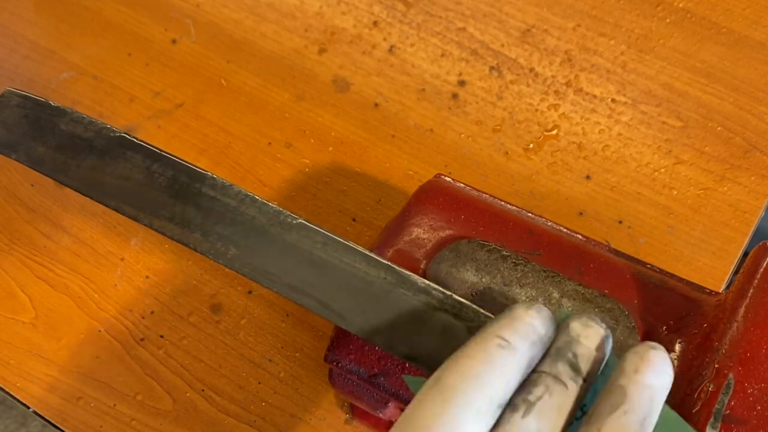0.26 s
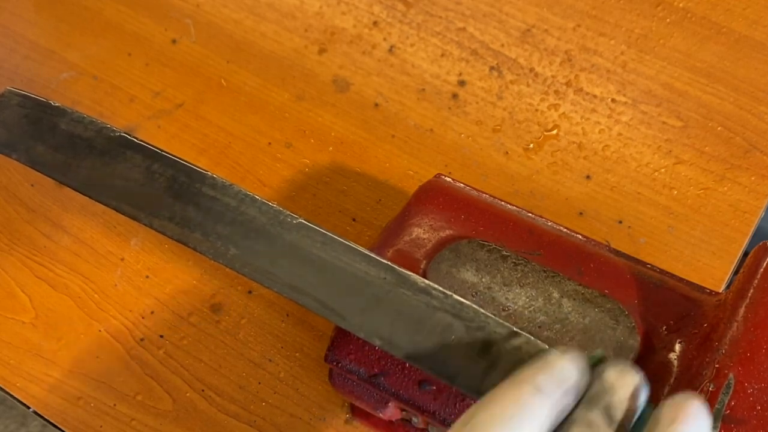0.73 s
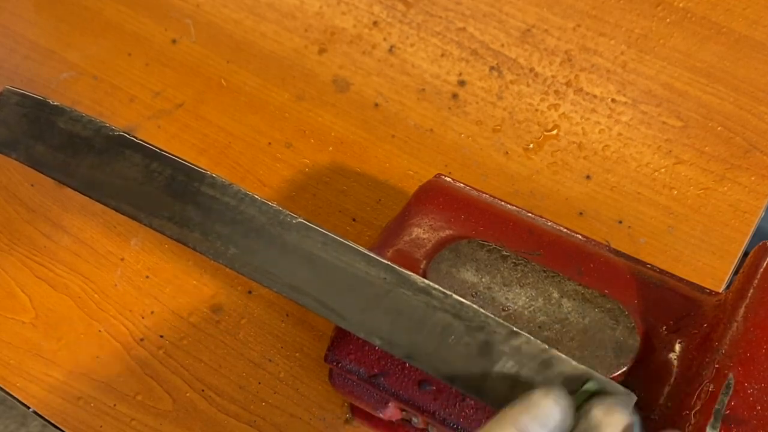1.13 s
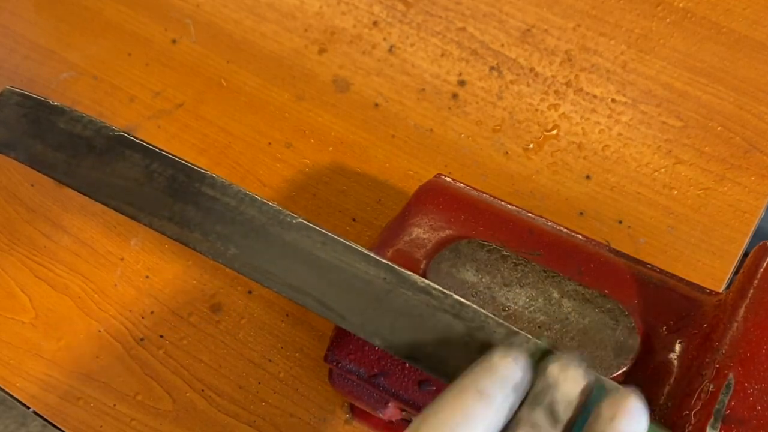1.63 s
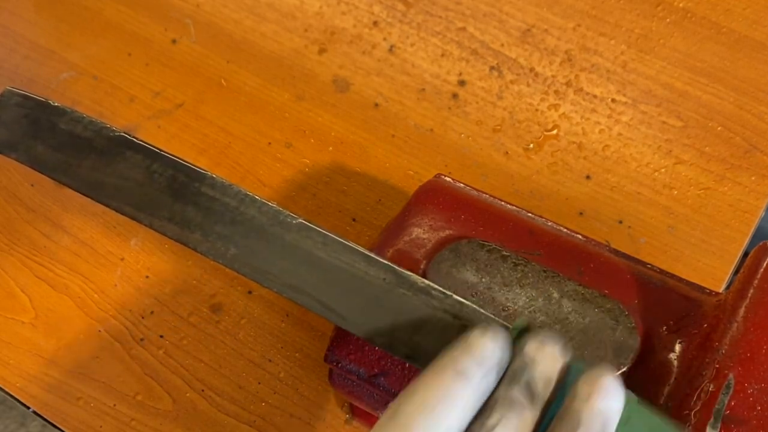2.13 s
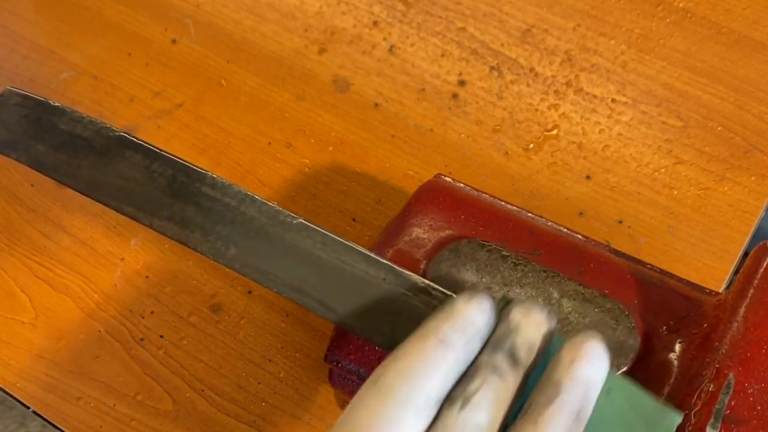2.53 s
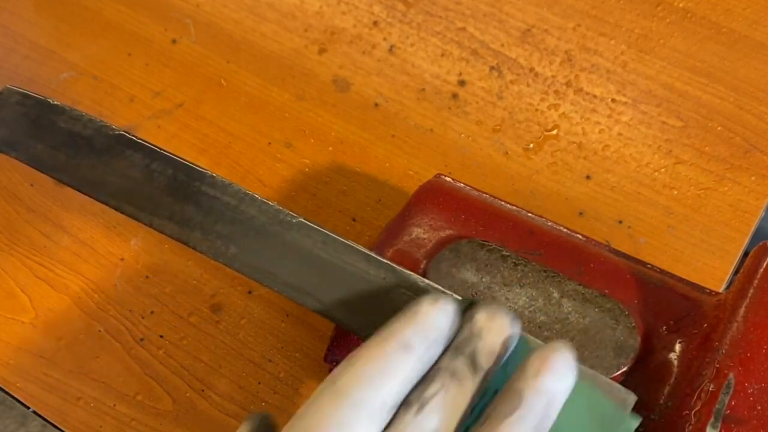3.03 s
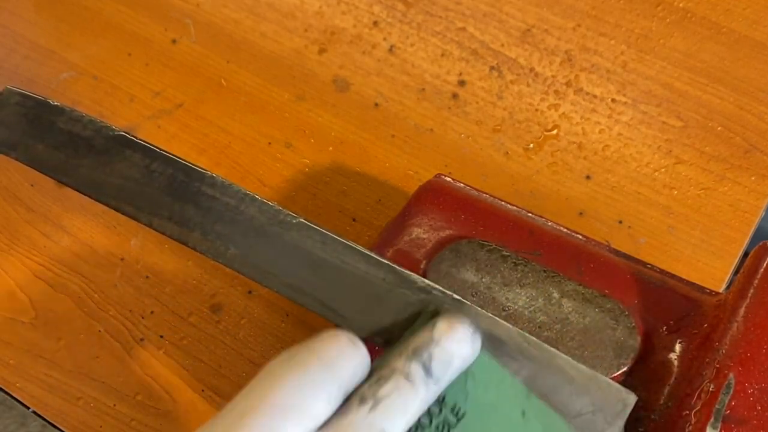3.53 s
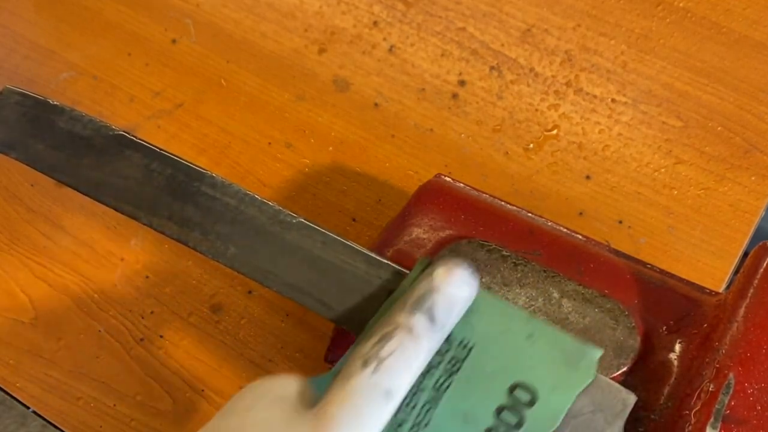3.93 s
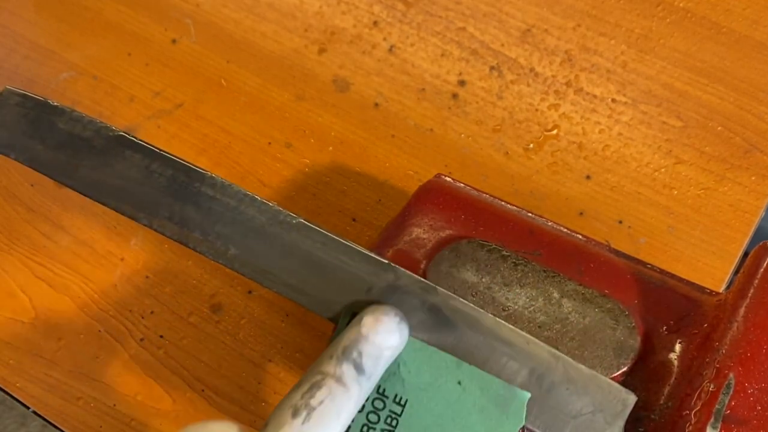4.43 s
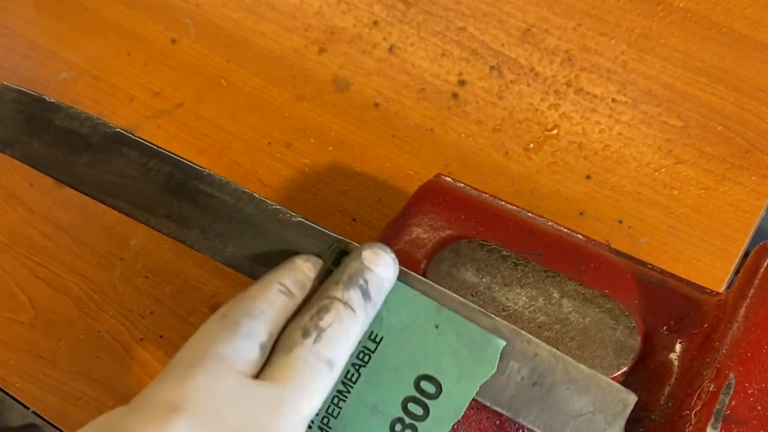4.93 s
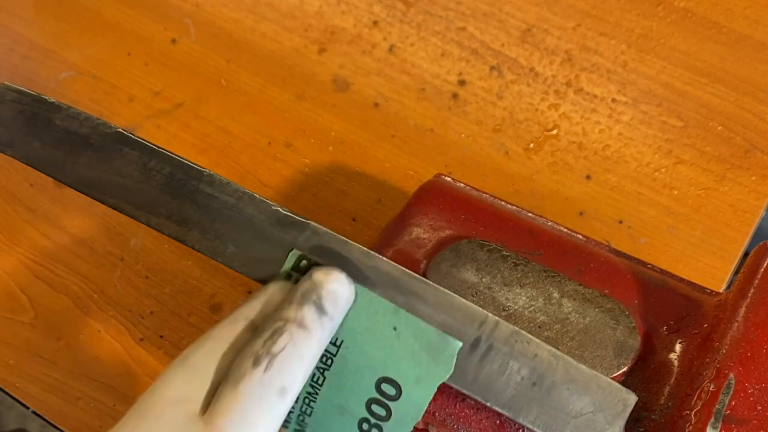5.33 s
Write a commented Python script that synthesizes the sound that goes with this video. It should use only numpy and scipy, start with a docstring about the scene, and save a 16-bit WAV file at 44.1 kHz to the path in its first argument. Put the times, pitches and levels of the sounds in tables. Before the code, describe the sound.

Close, dry sandpaper strokes on a steel blade in a vice, about eight per second, alternating push and pull with tiny gaps. The rasp is bright and gritty with faint metallic ringing and a low bench rumble. Dull knocks come near one and two seconds, with small snaps between. Around four and a half seconds the strokes suddenly become four times faster and two octaves higher. Small quiet workshop, close stereo microphone.

```python
"""Fine sandpaper is rubbed back and forth by hand along a steel blade clamped in a vice on a wooden bench.
From the start each stroke bites at once, drags a spray of random grit scratches and dies as the hand turns.
Narrow resonances ring in the blade and low noise rumbles in the bench; dull knocks fall near 1 s and 2 s.
Coarse grains snap near 1 to 1.5 s and again after 5 s, as short bursts of noise.
The last second runs in fast motion, so the strokes flutter by four times as fast and two octaves higher."""
import sys
import numpy as np
from scipy import signal
from scipy.fft import rfft, irfft, next_fast_len
from scipy.io import wavfile

SR = 44100
rng = np.random.default_rng(int(sys.argv[2]) if len(sys.argv) > 2 else 0)


def transcribe(signal):
    """Save signal, clipped to [-1, 1], as a 16-bit WAV file at the path in sys.argv[1]."""
    frames = np.atleast_2d(signal).T
    limited = np.clip(frames, -1, 1)
    pcm = np.round(limited * 32767).astype(np.int16)
    wavfile.write(sys.argv[1], SR, pcm)


N = 245637

# Durations, rates and frequencies are those at natural pace; table times t are the moments heard.
FAST_FROM_S, FAST_FACTOR = 4.465, 4
LIVE = int(FAST_FROM_S * SR) + FAST_FACTOR * (N - int(FAST_FROM_S * SR))   # samples at natural pace
# extra pressure at the near end of the travel, where pushes start and pulls finish: t/s, level/dB
PRESSURE_TILT = [(0.3, -2.5), (0.55, -1.5), (0.9, 0), (1.2, 6), (1.5, 4.5), (1.95, 1), (4.45, -.5)]


def from_db(db):
    """Level and amplitude are related logarithmically: decibels to gain."""
    return 10 ** (np.asarray(db) / 20)


def rms_one(x):
    """Root-mean-square normalisation: scale to rms 1."""
    return x / np.sqrt(np.mean(x ** 2) + 1e-20)


def live(s):
    """Time compression: the natural-pace sample that is heard at time s."""
    return (s + (FAST_FACTOR - 1) * np.maximum(np.asarray(s) - FAST_FROM_S, 0)) * SR


def in_time(rows):
    """Linear interpolation of (t/s, value) rows, read at every natural-pace sample."""
    s, values = np.transpose(list(rows))
    return np.interp(np.arange(LIVE), live(s), values)


def at_hz(points, hz):
    """Interpolation of (f/Hz, value) rows on a log-frequency axis."""
    table = np.array(points)
    return np.interp(np.log(hz), np.log(table[:, 0]), table[:, 1])


def filtered(x, response):
    """Linear filtering: multiply the spectrum by a response given as a function of Hz."""
    size = next_fast_len(x.shape[-1] + 4096)
    hz = np.maximum(np.arange(size // 2 + 1) * SR / size, 1)
    return irfft(rfft(x, size) * response(hz), size)[..., :x.shape[-1]]


def coloured(x, spectrum):
    """Spectral shaping: weight x by a table of levels over frequency, then scale to rms 1."""
    return rms_one(filtered(x, lambda hz: from_db(at_hz(spectrum, hz))))


def band(x, centre_hz, octaves):
    """Band-pass filtering with a flat top and soft edges, without phase shift."""
    return filtered(x, lambda hz: np.exp(-(np.log2(hz / centre_hz) / octaves) ** 4))


def drift(rate_hz):
    """Low-passed random noise: slow fluctuation of rms 1."""
    return rms_one(filtered(rng.standard_normal(LIVE), lambda hz: 1 / (1 + (hz / rate_hz) ** 2)))


def resonance(x, hz, width_hz):
    """Damped oscillator: a two-pole resonance with gain 1 at its peak."""
    r = np.exp(-np.pi * width_hz / SR)
    poles = [1, -2 * r * np.cos(2 * np.pi * hz / SR), r * r]
    return signal.lfilter(np.array([1, 0, -1]) * (1 - r * r) / 2, poles, x)


def background(spectrum, level_db, side_db):
    """Partial correlation: noise shared by both channels plus a side part of opposite sign in each."""
    mid, side = coloured(rng.standard_normal((2, LIVE)), spectrum)
    return from_db(level_db) * (mid + from_db(side_db) * side * [[1], [-1]])


def workshop_air():
    """Stationary broadband noise: the still air of the workshop, with a strong side part."""
    # spectrum of the air noise: f/Hz, relative level/dB
    air_spectrum = [(10, -0.5), (60, -11), (250, -8), (550, -4), (900, -6.5), (3000, -24.5), (8000, -25),
                    (16000, -20)]
    return background(air_spectrum, level_db=-75.5, side_db=-1.0)


def bench_rumble():
    """Forced vibration: the arm shakes the bench, heard as low noise nearly alike in both channels."""
    # spectrum of the bench noise: f/Hz, relative level/dB
    bench_spectrum = [(20, -30), (32, -12), (41, 1), (48, -1), (62, -1), (90, -8), (140, -9), (220, -14),
                      (800, -26.5)]
    # how hard the arm shakes the bench: t/s, level/dB
    shaking = [(0, -71), (1.0, -69.5), (1.8, -70), (2.6, -67.5), (3.6, -73), (4.2, -67.5), (5.42, -71.5),
               (5.51, -63.5), (5.57, -65)]
    return background(bench_spectrum, in_time(shaking), side_db=-22)


def reflections(x, t60, cut_hz):
    """Diffuse reverberation: dense dying reflections, different in each channel and dulled on top."""
    t = np.arange(int(t60 * SR)) / SR
    tail = rng.standard_normal((2, len(t))) * from_db(-60 * t / t60)
    tail /= np.sqrt(np.sum(tail ** 2, axis=1, keepdims=True))   # unit energy
    wet = signal.fftconvolve(x[None], tail, axes=1)[:, :LIVE]
    return filtered(wet, lambda hz: 1 / np.sqrt(1 + (hz / cut_hz) ** 2))


def ports(x):
    """Interaural-type phase and level differences: the two ports hear the blade slightly differently."""
    # phase by which the left port leads the right: f/Hz, phase/rad
    phase_lead = [(200, 0), (520, -0.3), (1900, 0), (2410, 0.65), (3500, 0.3), (4250, 1.2), (5000, -0.1),
                  (7200, 3.1), (10300, 6.3), (13600, 9.4), (16000, 12.2)]
    # level of the left port over the right: f/Hz, level/dB
    balance = [(250, 0.5), (600, -2), (1050, 2.5), (1300, 0), (3800, -0.5), (4450, -3.5), (4900, 0)]
    left = filtered(x, lambda hz: from_db(at_hz(balance, hz) / 2))
    right = filtered(x, lambda hz: from_db(-at_hz(balance, hz) / 2) * np.exp(-1j * at_hz(phase_lead, hz)))
    return np.array([left, right])


def bursts(events, t60, centre_hz, octaves):
    """Exponential decay: each event starts a short dying burst of noise in one band."""
    out, t = np.zeros(LIVE), np.arange(int(t60 * SR)) / SR
    for s, start_db in events:
        at = int(live(s))
        out[at:at + len(t)] += from_db(start_db - 60 * t / t60) * rng.standard_normal(len(t))
    return band(out, centre_hz, octaves)


def knocks():
    """Impulsive excitation: the blade shifts in the vice with a dull knock."""
    # knocks: t/s, starting level/dB of the noise ahead of the band filter
    knock_events = [(1.007, -35), (1.19, -42), (2.01, -63)]
    return bursts(knock_events, t60=0.11, centre_hz=424, octaves=0.7)


def snags():
    """Sudden release: coarse grains catch and snap."""
    # snaps: t/s, starting level/dB of the noise ahead of the band filter
    snag_events = [(0.986, -53), (1.274, -41), (1.519, -39), (5.082, -48), (5.097, -27), (5.2045, -50)]
    return bursts(snag_events, t60=0.0042, centre_hz=4050, octaves=1.74)


def blade_hum(speed):
    """Modal excitation: the dragging hand keeps the bending modes humming, a little less at each turn."""
    # bending modes of the clamped blade, lowest first: f/Hz, width/Hz, rms level/dB ahead of the freedom
    bending_modes = [(250, 3.9, -79), (346, 63, -86), (450, 39, -81), (491, 23, -83), (527.4, 12, -84.5),
                     (610, 11, -91)]
    # how freely the lowest mode swings as the fingers move along: t/s, level/dB
    freedom = [(0.2, -6), (0.7, 5), (1.1, -10), (1.6, 2.5), (2.2, -2), (3.1, 0), (3.8, -21), (4.5, -7)]
    drag = (0.33 + 0.77 * np.sqrt(np.abs(speed))) * rng.standard_normal(LIVE)
    modes = [from_db(db) * rms_one(resonance(drag, hz, width_hz)) for hz, width_hz, db in bending_modes]
    lowest, *others = modes
    freedom_db = in_time(freedom)
    # near the vice the fingers drive the higher modes in place of the lowest
    return lowest * from_db(freedom_db) + sum(others) * from_db(-0.2 * freedom_db)


def all_strokes():
    """Periodic motion: every stroke as (start s, length s, level dB, dip dB), evenly spaced within a run."""
    # single strokes, pushes and pulls in turn: t/s, length/s, level/dB, dip as the fingers ease/dB
    single_strokes = [(0, 0.053, -40, -1), (0.081, 0.12, -42.2, -1), (0.211, 0.109, -42.5, -2.5),
                      (0.348, 0.11, -42, -0.5), (0.47, 0.112, -41.5, -1), (0.607, 0.11, -40, -0.5),
                      (0.732, 0.1, -41.5, -0.5), (0.865, 0.1, -41, 0), (0.992, 0.095, -43, -3.5),
                      (1.118, 0.1, -42, -3.5), (1.244, 0.11, -43, -3), (1.373, 0.11, -42, -1.5),
                      (1.506, 0.11, -42, -1.5), (1.631, 0.1, -42.5, 0.5), (1.758, 0.1, -43, 0.5),
                      (1.881, 0.1, -43.5, 1), (2.009, 0.11, -42.5, 2), (2.135, 0.11, -43.5, -0.5),
                      (2.262, 0.11, -43, 1), (2.396, 0.11, -42, 0.5), (2.526, 0.1, -42, 2),
                      (2.653, 0.11, -41.5, 2.5), (2.78, 0.11, -41.2, -1), (2.907, 0.1, -38.5, 5),
                      (3.03, 0.11, -41.5, -0.5), (3.164, 0.11, -40.5, 5.5), (3.292, 0.12, -43.5, 0.5),
                      (3.43, 0.1, -40, 1.5), (3.561, 0.099, -45, 0.5), (3.694, 0.11, -40.5, 4.5),
                      (3.825, 0.11, -40.5, 1.5), (3.959, 0.12, -36.5, 10.0), (4.097, 0.1, -39, 2),
                      (4.224, 0.1, -36.5, 10), (4.35, 0.106, -40, -1.0)]
    # unbroken runs of strokes in fast motion: start t/s, end t/s, mean level/dB
    fast_runs = [(4.469, 4.488, -40.5), (4.489, 4.811, -38.5), (4.809, 4.945, -40.5), (4.945, 5.077, -41),
                 (5.154, 5.168, -39), (5.181, 5.316, -38.5), (5.318, 5.583, -38)]
    strokes_per_s = 7.7
    sliding_share = 0.82   # part of each beat during which the paper moves
    spread_db, dip_spread_db = 2, 4.5   # how the strokes of a run differ
    strokes = list(single_strokes)
    for start, end, level_db in fast_runs:
        count = max(1, round((end - start) * strokes_per_s * FAST_FACTOR))
        beat = (end - start) / count
        for k, (louder, deeper) in enumerate(rng.standard_normal((count, 2))):
            stroke_db = level_db + spread_db * louder
            strokes.append((start + k * beat, sliding_share * beat, stroke_db, dip_spread_db * deeper))
    return strokes


def hand(bite_s, stop_s, overrun_s):
    """Sliding friction: strength, relative speed and direction (push +1, pull -1) from bite to rest."""
    creep_s, creep_db = 0.01, -23.5   # the paper creeps faintly before it breaks loose
    fade_db = 1.5   # fall from this far above the level to as far below, ahead of the pressure tilt
    dip_at, dip_width = 0.34, 0.11   # as shares of the stroke
    n, (strength, speed, direction) = np.arange(LIVE), np.zeros((3, LIVE))
    for k, (start, length, level_db, dip_db) in enumerate(all_strokes()):
        first = live(start)
        last = live(start + length) + overrun_s * SR
        span = n[max(int(first - creep_s * SR), 0):int(last)]
        along = np.clip((span - first) / (last - first), 0, 1)
        way = (-1) ** k
        bite = np.clip((span - first) / (bite_s * SR), from_db(creep_db), 1)
        stop = np.clip((last - span) / (stop_s * SR), 0, 1)
        tilt_db = np.interp(start + length / 2, *np.transpose(PRESSURE_TILT))
        slope_db = (fade_db + way * tilt_db) * (1 - 2 * along)
        # a negative dip swells instead
        ease_db = dip_db * np.exp(-((along - dip_at) / dip_width) ** 2)
        strength[span] += bite * stop * from_db(level_db + slope_db - ease_db)
        speed[span] = np.sin(np.pi * along)
        direction[span] = way
    return strength, speed, direction


def grit(per_s, spread_db, hiss_db):
    """Random impulse noise: grains of uneven size scratch the steel over the hiss of the finest ones."""
    size_db = spread_db * np.minimum(rng.exponential(1, LIVE), 4)
    sizes = from_db(size_db) * rng.choice([-1, 1], LIVE)
    grains = rms_one(sizes * (rng.random(LIVE) < per_s / SR))
    return grains + from_db(hiss_db) * rng.standard_normal(LIVE)


def sandpaper(strength, speed, direction):
    """Friction noise: hollow while slow, brighter at speed, fuller under pressure, juddering a little."""
    # grit on steel: f/Hz, relative level/dB
    rasp_spectrum = [(40, -46), (120, -28.5), (300, -19), (680, -22), (850, -16), (1250, -17.5),
                     (1600, -7.5), (2700, -2.5), (4000, -4.5), (5300, 1.5), (7000, -2), (9000, -4),
                     (12000, -4.5), (15500, -11.5)]
    # hollow rasp of the loose sheet as the fingers shift their hold: t/s, level/dB
    hollow_curve = [(0.2, -1), (0.7, -2.05), (2.1, -1.5), (3.0, 1.25), (3.6, 5.5), (3.8, 2), (4.4, 0),
                    (4.6, -2)]
    # sheen of the paper's edge: t/s, level/dB
    sheen_curve = [(0.1, -3), (0.7, -2.5), (1.25, 3.5), (1.6, 0), (2.2, -0.2), (2.95, -5.5), (3.45, -1.5),
                   (4.4, -0.5), (4.6, -22)]
    # whistle of the paper's edge near 5 kHz: t/s, level/dB
    whistle_curve = [(0, -2), (0.8, -5.5), (1.5, 2), (2.2, -2), (3.4, 2.5), (4.4, 1)]
    # level of the rasp near 6 kHz: t/s, level/dB
    upper_curve = [(0.7, 0.5), (1.4, 3.5), (2.1, 3.1), (3.0, 1), (3.5, -1.5), (4.4, -2.5)]
    pull_hollow_db, pull_sheen_db, push_whistle_db = 0.06, 0.35, 0.75   # colour tied to direction
    body_per_tilt = 0.69   # dB of low rasp per dB of extra pressure
    rasp = coloured(grit(per_s=12000, spread_db=2.5, hiss_db=0.0), rasp_spectrum)
    hollow_db = in_time(hollow_curve) - pull_hollow_db * direction - 3.96 * (speed - 0.77) + drift(26)
    sheen_db = in_time(sheen_curve) - pull_sheen_db * direction + 3.5 * (speed - 1.09) + 2.1 * drift(20)
    whistle_db = in_time(whistle_curve) + push_whistle_db * direction + 1.3 * drift(7.4)
    fizz_db = 11.0 * (speed - 1.06)
    body_db = body_per_tilt * np.maximum(in_time(PRESSURE_TILT), 0)
    upper_db = in_time(upper_curve)
    # each band is already in the rasp once, so only gain - 1 of it is added
    rasp = (rasp + (from_db(hollow_db) - 1) * band(rasp, centre_hz=1890, octaves=1.0)
            + (from_db(body_db) - 1) * band(rasp, centre_hz=1270, octaves=0.35)
            + (from_db(upper_db) - 1) * band(rasp, centre_hz=6140, octaves=0.16)
            + (from_db(whistle_db) - 1) * band(rasp, centre_hz=4980, octaves=0.16)
            + (from_db(sheen_db) - 1) * band(rasp, centre_hz=8130, octaves=0.44)
            + (from_db(fizz_db) - 1) * band(rasp, centre_hz=14200, octaves=0.49))
    judder_db = 0.75 * drift(81) - 0.75
    return rasp * strength * from_db(judder_db)


def blade(scratch):
    """Resonance: the steel adds its own narrow rings to whatever scratches it."""
    # high modes of the blade: f/Hz, width/Hz, gain on the scratch/dB
    high_modes = [(1930, 120, -8), (2640, 160, -13), (3320, 540, -7.5), (4140, 97, -2.5), (7950, 53, -3),
                  (10130, 56, 2), (11400, 56, -9)]
    rings = sum(from_db(db) * resonance(scratch, hz, width_hz) for hz, width_hz, db in high_modes)
    return scratch + rings


def fast_motion(x):
    """Time compression raises pitch: from the change of pace on, everything plays faster and higher."""
    cut = int(FAST_FROM_S * SR)
    return np.hstack([x[:, :cut], signal.resample_poly(x[:, cut:], 1, FAST_FACTOR, axis=1)])


def scene():
    """Superposition: blade close to two microphone ports, with bench top and workshop around it."""
    strength, speed, direction = hand(bite_s=0.0066, stop_s=0.016, overrun_s=0.0033)
    scratch = sandpaper(strength, speed, direction) + snags()
    steel = blade(scratch) + blade_hum(speed) + knocks()
    # the bench top scatters from the same direction as the blade, the workshop from all around
    bench_top = from_db(-11.5) * reflections(steel, t60=0.079, cut_hz=30000)[0]
    workshop = from_db(-15.0) * reflections(steel, t60=0.22, cut_hz=3000)
    # hand and vice scatter the rasp differently to each port
    rasp_band = band(steel, centre_hz=5930, octaves=1.9)
    nearby = from_db(-15.5) * reflections(rasp_band, t60=0.022, cut_hz=3300)
    direct = ports(steel + bench_top)
    return fast_motion(direct + nearby + workshop + bench_rumble() + workshop_air())


def record(dry):
    """Low-pass filtering: the top is cut steeply, over 200 Hz around the cutoff."""
    cutoff_hz = 15800
    return filtered(dry, lambda hz: np.clip((cutoff_hz - hz) / 200 + 0.5, 0, 1))


dry = scene()
out = record(dry)
transcribe(out)
```